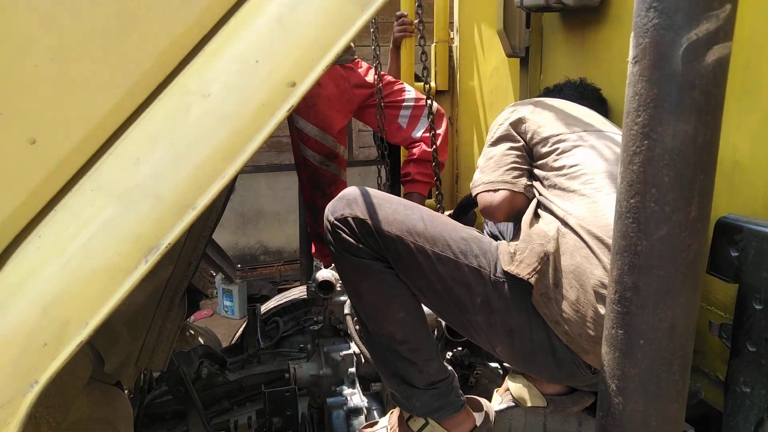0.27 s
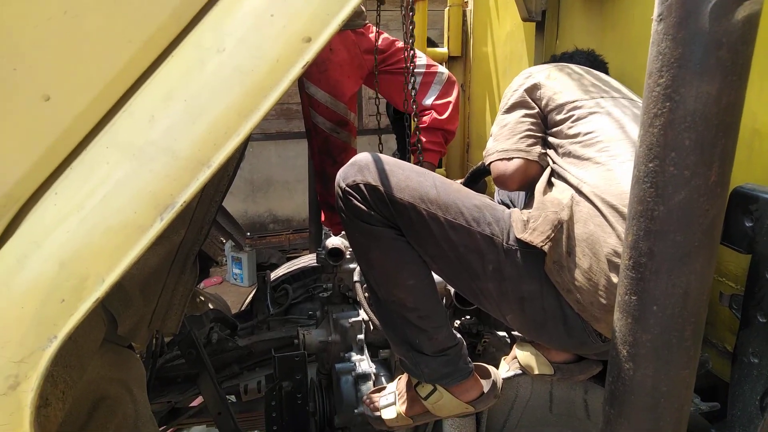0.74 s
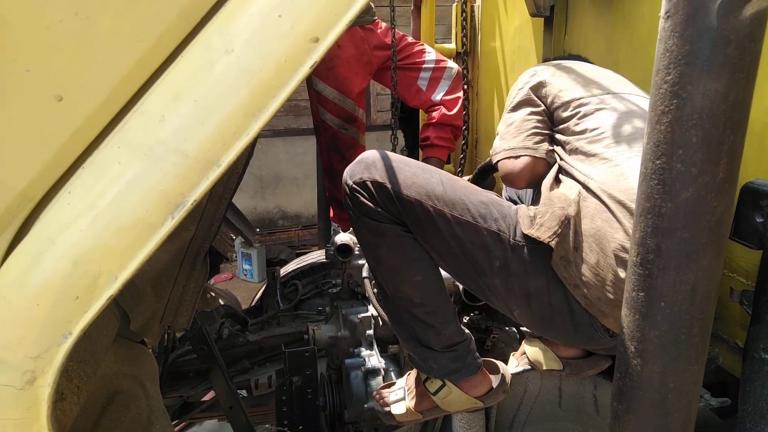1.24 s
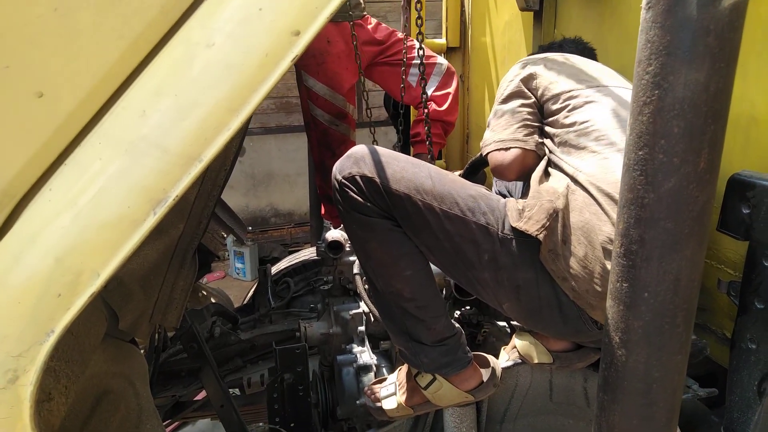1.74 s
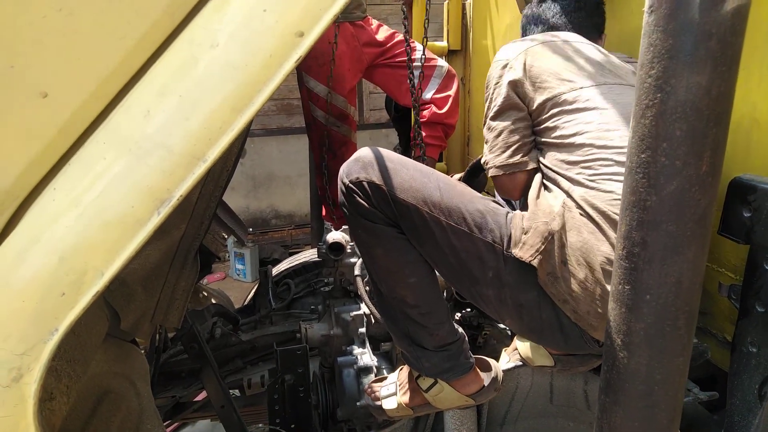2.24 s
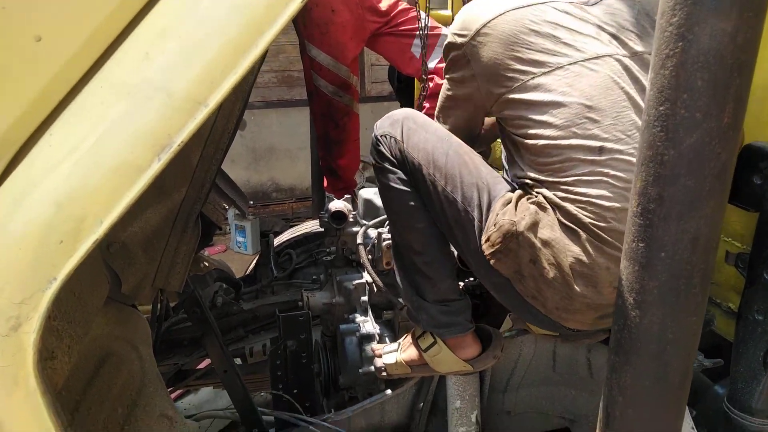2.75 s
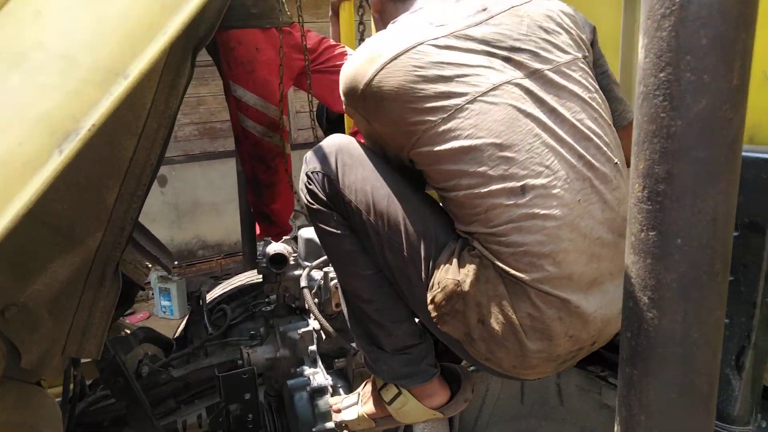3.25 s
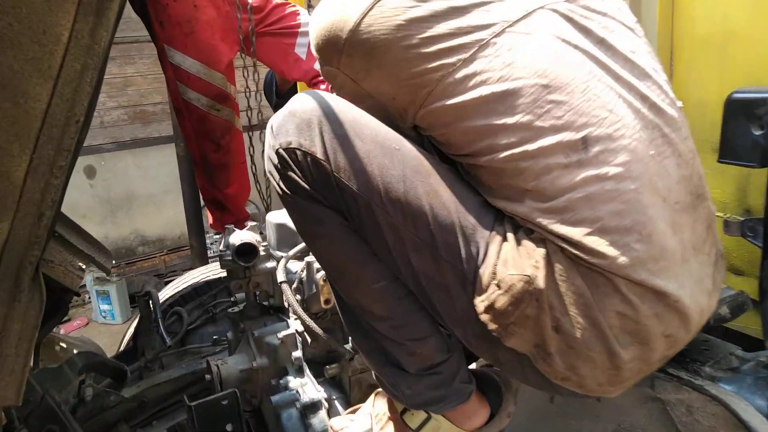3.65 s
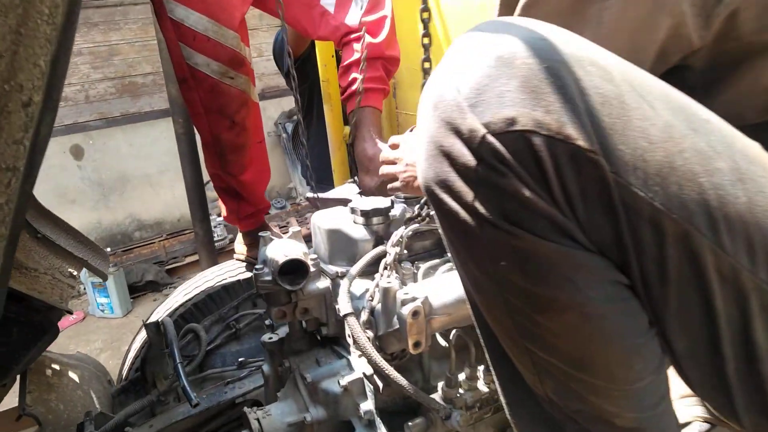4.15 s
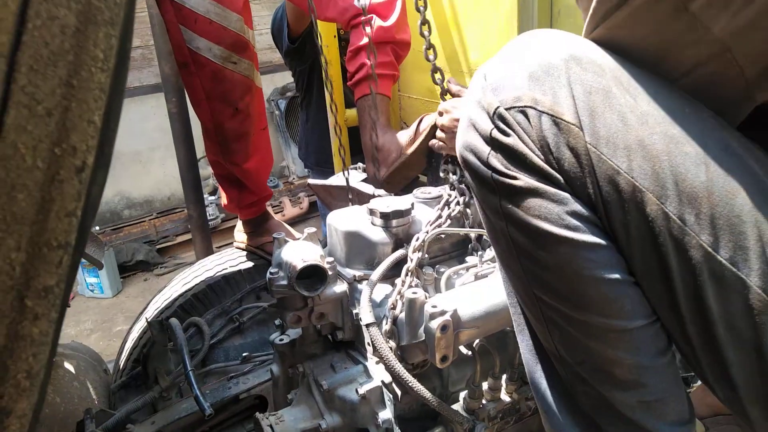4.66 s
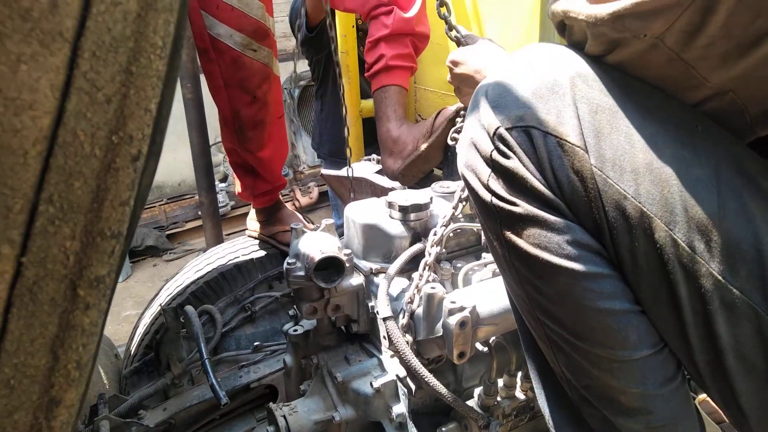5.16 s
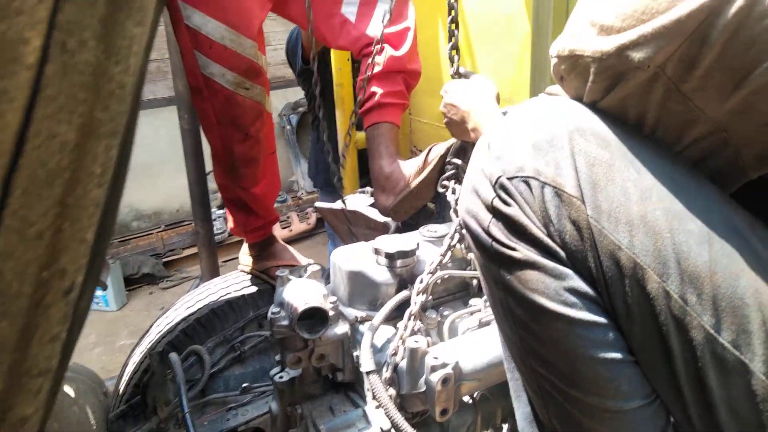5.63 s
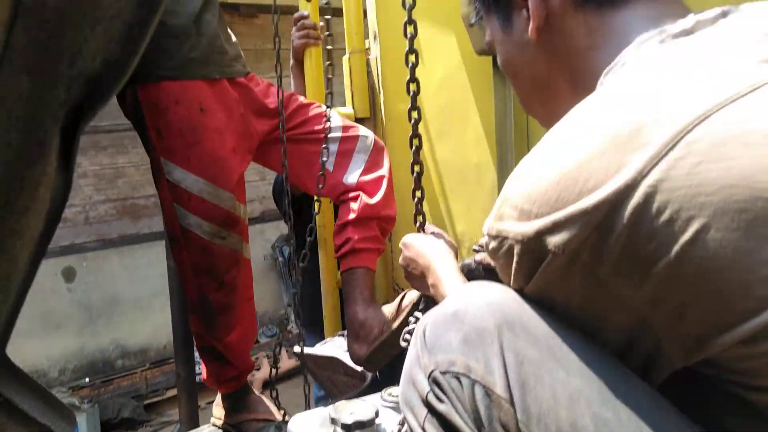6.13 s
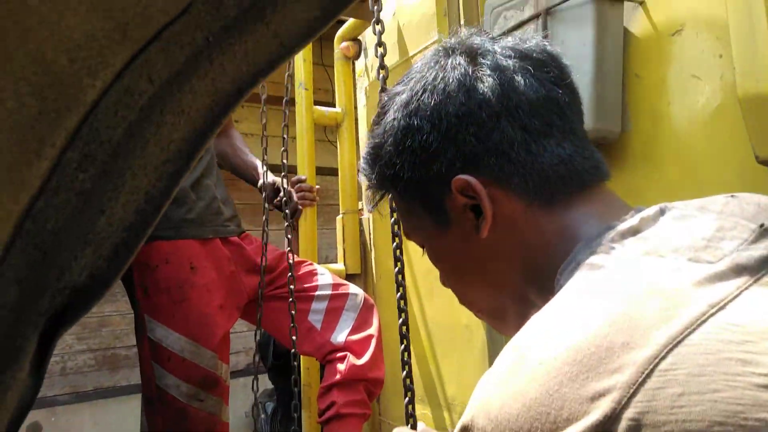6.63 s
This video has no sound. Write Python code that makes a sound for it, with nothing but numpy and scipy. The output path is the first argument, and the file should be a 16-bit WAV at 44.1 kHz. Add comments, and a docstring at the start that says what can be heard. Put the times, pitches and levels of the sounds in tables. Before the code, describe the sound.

Heavy chain links jingle and clatter over a hoist wheel, with ratchet clicks early on and increasingly loud metallic slaps on a truck cab.

```python
"""In an open-air workshop, a manual chain hoist is worked over a truck engine.
Its pawl clicks in runs, built from short bursts of coloured noise timed by the teeth.
The swinging chain slaps the tilted steel cab: noise bursts shake decaying sine waves, the panel's modes.
The hand chain runs in a stream of tiny random contacts, which jingle on high notes and set the
hoist's wheel and housing ringing. Low noise makes the yard, and pairs of tones the singing wheel."""
import sys
import numpy as np
from scipy import signal
from scipy.fft import rfft, irfft
from scipy.io import wavfile
from scipy.ndimage import map_coordinates

SR = 44100
rng = np.random.default_rng(int(sys.argv[2]) if len(sys.argv) > 2 else 0)


def pcm_store(signal):
    """Save signal as 16-bit PCM."""
    levels = np.round(np.clip(np.atleast_2d(signal), -1, 1) * 32767)
    wavfile.write(sys.argv[1], SR, levels.astype(np.int16).T)


N = 303849

# All table levels are relative: the functions add fixed offsets to them.
# pawl hauls, each a list of points: (t/s, speed/teeth per s, level/dB)
PAWL_HAULS = [
    [(0.012, 26, -26), (0.17, 30.1, -22), (0.213, 44.5, -22.5), (0.466, 66.5, -24.5), (0.529, 30.2, -24),
     (0.63, 11.6, -23)],
    [(1.656, 10, -22.5), (1.7, 10, -22.5)],
    [(1.809, 18.6, -28), (1.94, 18.6, -27)],
    [(2.202, 24.2, -22), (2.434, 15, -23), (2.552, 40.7, -21.5), (2.85, 44, -24.5), (3.14, 38, -28)],
]
# short trains of blows on the cab, mostly the slack chain hitting it; the train from 1.809 s falls with the
# pawl's teeth: (first t/s, last t/s, count, clang level/dB, boom level/dB, edge level/dB, change from blow to
# blow/dB, note of the striking links f/Hz)
CAB_SLAPS = [(0.005, 0.045, 2, -22, -28.5, -29, -0.5, 2410), (0.11, 0.16, 3, -19.5, -34, -47, -1, 2153),
             (0.29, 0.311, 2, -13, -26, -22.5, 1, 1800), (0.362, 0.418, 2, -14, -24, -22, -2, 1754),
             (0.452, 0.492, 2, -14.5, -20.5, -19.5, -2.5, 1650),
             (0.901, 1.021, 3, -24, -28, -29.5, -5.5, 2960),
             (1.171, 1.202, 2, -32.5, -32.5, -44.5, -0.5, 2354),
             (1.5, 1.555, 2, -37, -49, -44.5, -0.5, 3360), (1.72, 1.745, 2, -25, -32, -38, -1, 2820),
             (1.809, 1.917, 3, -21.5, -26.5, -30.5, 2.5, 1843),
             (1.966, 2.045, 2, -28, -33.5, -35, -3.5, 1580), (2.5, 2.533, 2, -15.5, -24, -35, 2.5, 1757),
             (2.581, 2.607, 2, -12.5, -19.5, -37, -0.5, 1740),
             (2.655, 2.701, 2, -13.5, -20.5, -20.5, -2, 2660),
             (2.796, 2.84, 2, -18, -16.5, -20.5, -1, 2790), (2.992, 2.992, 1, -16.5, -22, -20, 0, 3450),
             (3.053, 3.053, 1, -16.5, -13, -20, 0, 2890), (3.181, 3.227, 2, -17.5, -26, -38, 2.5, 1810),
             (4.171, 4.171, 1, -12.5, -38, -39, 0, 1255), (4.547, 4.574, 2, -10.5, -28.5, -27, -6.5, 1872),
             (4.631, 4.656, 2, -10.5, -28, -25.5, -1, 2170), (4.712, 4.731, 2, -13, -26.5, -23, 0.5, 978),
             (4.787, 4.827, 3, -17, -28, -23, 2, 1997), (5.186, 5.252, 2, -15.5, -36.5, -17.5, -3, 2940),
             (5.523, 5.553, 2, -11, -23.5, -22, 0, 1655), (5.595, 5.612, 2, -14, -24.5, -22, -2.5, 2470),
             (5.65, 5.65, 1, -12.5, -30.5, -21.5, 0, 2970), (5.867, 5.867, 1, -17.5, -45, -15, 0, 2090),
             (5.889, 5.966, 3, -11, -24.5, -22.5, -1, 1834), (6.013, 6.113, 2, -19, -28.5, -24, -0.5, 1804),
             (6.26, 6.301, 2, -12, -35.5, -16.5, -1, 1776), (6.318, 6.359, 2, -12.5, -30, -22.5, -1, 1250),
             (6.403, 6.433, 2, -14, -24.5, -21, -5, 1310), (6.593, 6.593, 1, -13, -21.5, -20.5, 0, 3070)]
# links knocking on the hoist in trains: (first t/s, last t/s, count, ring level/dB, edge level/dB,
# change from blow to blow/dB)
HOIST_KNOCKS = [(0.845, 0.845, 1, -55, -52, 0), (1.09, 1.125, 2, -46, -48.5, -2),
                (1.27, 1.33, 2, -35, -53, -9), (1.465, 1.465, 1, -42, -60, 0),
                (2.194, 2.313, 2, -19.5, -30, -1), (3.282, 3.343, 2, -22, -39, 3),
                (3.405, 3.461, 2, -17.5, -22, -0.5), (3.505, 3.589, 3, -14.5, -22, -1),
                (3.68, 3.783, 3, -16, -29, 0), (4.013, 4.04, 2, -17.5, -22.5, 2.5),
                (4.17, 4.23, 2, -20, -40, -1.5), (4.319, 4.356, 2, -20, -23, 3.5),
                (5.057, 5.057, 1, -24.5, -46, 6), (5.469, 5.469, 1, -23.5, -48, 0),
                (6.152, 6.198, 2, -41, -25.5, 3.5)]
# the running chain: (t/s, jingle level/dB, clatter level/dB)
CHAIN_RUN = [(0.0, -30.5, -30), (0.5, -34, -26.5), (0.85, -66, -67), (1.08, -57, -48), (1.42, -84, -66),
             (1.6, -49.5, -37), (1.97, -41, -25.5), (2.15, -61, -44), (2.6, -27.5, -19), (3.0, -29, -24.5),
             (3.33, -38, -28.5), (3.55, -24, -26.5), (4.15, -23.5, -28), (4.27, -28, -37.5),
             (4.45, -21, -30.5), (4.65, -31.5, -36.5), (5.33, -27.5, -34.5), (5.48, -24, -31),
             (5.72, -32.5, -42), (5.84, -25, -36.5), (6.07, -35, -41.5), (6.55, -29, -34.5),
             (6.89, -20, -32)]
# soft low bumps: (t/s, level/dB)
LOW_BUMPS = [(1.048, -33), (1.268, -32), (1.906, -37.5), (1.949, -31), (3.367, -30), (3.4, -36)]
# ringing modes of the cab's sheet steel: (f/Hz, energy level/dB, t60/s)
CAB_MODES = [(101.2, -8.5, .7), (167.6, -1, 1), (228.2, 0, 0.26), (243.7, -4, 0.26), (275, -0.5, 0.12),
             (380.5, -9, 0.18), (412, 3, 0.24), (730, 1, 0.21), (759, -1, 0.065), (962, -1, 0.15),
             (1193, -10, 0.53), (1381, 1.5, 0.1), (1670, 2, 0.35), (1802, 1, 0.25), (1930, 0.5, 0.1),
             (2384, 2.5, .15), (2930, -17, 0.19), (3090, -14, 0.089), (3550, 2.5, 0.11)]
# ringing modes of the hoist's wheel and housing: (f/Hz, energy level/dB, t60/s)
HOIST_MODES = [(854, -3.5, 0.37), (964, -7, .08), (1137, -14, 0.4), (1265, -11, 0.21), (1509, -9, 0.68),
               (1767, 0, 0.079), (2034, -3, 0.065), (2470, 5, 0.072), (2575, 3, 0.044), (3470, 1, 0.055),
               (4400, -6, .1), (4690, -3.5, 0.27), (5190, -3, .2)]
# spectrum shapes, whose overall level is evened out later: each (f/Hz, level per Hz/dB)
CLICK_COLOUR = [(500, -15.5), (900, -6), (1800, -21.5), (3500, -9), (5200, -5), (6000, -3), (6530, 1),
                (6900, -4), (7750, 1.5), (8200, -5.5), (8850, -1.5), (9500, -13.5), (12500, -20),
                (15500, -41)]  # pawl on tooth
BOOM_COLOUR = [(50, -41), (100, -29), (180, -17.5), (240, -4), (310, -5), (420, 4.5), (520, -10),
               (620, -10), (760, -1.5), (950, -18.5), (2000, -58)]  # low part of a slap
CLANG_COLOUR = [(60, -42), (250, -24), (550, -20), (760, -4.5), (1050, -2), (1400, -2.5), (1750, 2),
                (2100, 1), (2400, -0.5), (2700, -0.5), (3000, 3.5), (3400, -5), (4200, -5.5), (7000, -43)]  # middle part of a slap
EDGE_COLOUR = [(2000, -46), (4000, 2), (5300, 8), (6400, 7), (7500, 3), (9500, -4), (13000, -13.5),
               (15500, -63)]  # bright part of slaps and knocks
JINGLE_COLOUR = [(1800, -49), (3000, -6.5), (3900, -12.5), (4400, -6.5), (5000, -8.5), (5500, -0.5),
                 (5900, -2), (6350, 3), (6800, -3), (7600, -6), (9000, -10), (11000, -15.5), (13200, -22),
                 (15500, -42)]  # small links
SCRAPE_COLOUR = [(50, -39), (100, -24), (250, -23), (520, -1.5), (820, 4), (1500, 3), (2500, 0.5),
                 (3000, 4.5), (3550, 2), (3950, -6.5), (4500, 5), (7000, -32.5)]  # chain on wheel
RUMBLE_COLOUR = [(20, -16), (33, -17), (45, 6.5), (65, -5.5), (110, 0.5), (200, -9), (400, -15),
                 (1000, -45), (4000, -25), (15000, -61)]  # yard
# the wheel sings under the sliding chain: (start t/s, end t/s, pitch f/Hz, level/dB)
WHEEL_SONGS = [(3.62, 4.246, 1549, -34.5), (6.616, 6.89, 1593, -37.5)]
# the moving microphone hears the parts differently: (t/s, hoist ring level/dB,
# deep panel level/dB, top treble level/dB, hollow boom level/dB)
MIC_VIEW = [(0, -9, -8, 3.5, 5.5), (1.2, -14, -14.5, 2.5, -1.5), (1.9, -26, -3.5, -5, 0),
            (3.1, -8.5, -16, -7.5, -1.5), (3.5, -7.5, -5, -4, 0), (4.2, -2, -6, 4, -0.5),
            (5.3, -1.5, 5, 3.5, 0), (6.2, 3.5, -3, 3, 0), (6.89, -2, 9.5, 0, 2)]
# loose links passing over the wheel: (t/s, speed/links per s)
LINK_SPEED = [(0, 0), (.62, 0), (.7, 14.5), (1.6, 13.5), (2.1, 0), (3.1, 0), (3.45, 61)]
# the drone is louder once the microphone has moved in beside the cab: (t/s, level/dB)
NEAR_CAB_LEVEL = [(0, -4.5), (1.9, -1), (4.2, -4.5), (4.8, 2), (6.89, 3)]

SING_RISE_S, SING_FALL_DB_PER_S = 0.15, 38
YARD_DB, YARD_WANDER_DB = -51.5, 2  # rumble of the yard and its slow drift
DRONE_RISE_S, DRONE_T60_S = 0.022, 0.84  # the cab keeps shaking after each slap
DRONE_SLAP_DB, DRONE_CLATTER_DB = -17, -16.5  # its share of the boom and of the running clatter
LINK_SPREAD = 0.0398  # typical spread of the main link notes in one train, as a log ratio
CLATTER_PER_S, CLATTER_UNEVEN_DB = 38, 2.5  # the clatter comes in clumps as links ride over the wheel
PINGS_PER_S, PING_DB = 24, -5.5  # single links ping the wheel at random, relative to the clatter
LOW_CUT_HZ, TOP_HZ = 34, 15700
DEEP_MODE_HZ = 300  # cab modes below this count as deep


def amp(db):
    """Turn decibels into gain."""
    return np.exp(np.asarray(db) * (np.log(10) / 20))


def unit(x):
    """Scale a sound to rms 1."""
    return x / np.sqrt(np.mean(x ** 2) + 1e-20)


def curves(rows):
    """Draw straight lines between table points: one value per sample for each column after time."""
    s, *cols = np.transpose(rows)
    return [np.interp(np.arange(N) / SR, s, c) for c in cols]


def wobble(rate):
    """Make a smooth random curve with this many random points a second."""
    at = np.arange(0, N + 64, 64)
    knots = rng.standard_normal(int(N * rate / SR) + 4)
    return np.interp(np.arange(N), at, map_coordinates(knots, [at * rate / SR]))


def through(x, response):
    """Pass a sound through an impulse response scaled to energy 1."""
    return signal.oaconvolve(x, response / np.linalg.norm(response))[:N]


def colour(points, size=4096):
    """Make an impulse response with the given spectrum that starts without delay."""
    hz, db = np.transpose(points)
    grid = np.log(np.fft.rfftfreq(size, 1 / SR) + 1)
    gain = amp(np.interp(grid, np.log(hz), db))
    cepstrum = irfft(np.log(gain + 1e-6))
    # folding the cepstrum forward packs the energy at the start (minimum phase)
    cepstrum[1:size // 2] *= 2
    cepstrum[size // 2 + 1:] = 0
    return irfft(np.exp(rfft(cepstrum)))


def ringing(modes):
    """Add up sine waves that die away, one for each way the metal can vibrate."""
    t = np.arange(SR) / SR
    total = 0
    for hz, db, t60 in modes:
        decay = amp(db - 60 * t / t60) / np.sqrt(t60)  # longer rings start softer, for equal energy
        total = total + decay * np.sin(2 * np.pi * hz * t)
    return total


def deep_cab():
    """Ring only the deepest modes of the cab's sheet steel."""
    return ringing([mode for mode in CAB_MODES if mode[0] < DEEP_MODE_HZ])


def chatter(times, db, rise, t60, grain_db):
    """Make each blow a quickly dying shower of tiny contacts, as noise of uneven size."""
    t = np.arange(SR // 2) / SR
    shape = (1 - np.exp(-t / rise)) * amp(-60 * t / t60)
    blows = np.bincount(np.clip(times * SR, 0, N - 1).astype(int), amp(db) ** 2, N)
    power = np.abs(signal.oaconvolve(blows, (shape / shape.max()) ** 2)[:N])
    grains = rng.standard_normal(N) * amp(grain_db * rng.standard_normal(N))
    return np.sqrt(power) * unit(grains)


def contacts(rate, scatter_db):
    """Scatter link contacts of uneven size at random times, scaled to rms 1."""
    chance, size, sign = rng.random(N), rng.standard_normal(N), rng.choice([-1, 1], N)
    return unit((chance < rate / SR) * sign * amp(scatter_db * np.clip(size, -2, 2)))


def echo(x, t60, size=4096):
    """Make a diffuse tail of dying noise, drawn afresh for each block so no fixed colouring builds up."""
    t = np.arange(SR // 3) / SR
    blocks = np.pad(x, (0, -N % size)).reshape(-1, size)
    fade = amp(-60 * t / t60) * (1 - np.exp(-t / 0.0059))
    tails = rng.standard_normal((len(blocks), len(t))) * fade
    tails = tails / np.linalg.norm(tails, axis=1, keepdims=True)
    wet = signal.fftconvolve(blocks, tails, axes=1)
    out = np.zeros(N + SR)
    for i, part in enumerate(wet):
        out[i * size:][:len(part)] += part
    return out[:N]


def trains(rows):
    """List time and levels of every blow: evenly spaced, each a fixed step louder or softer."""
    blows = []
    for first, last, count, *levels, step in rows:
        for k, s in enumerate(np.linspace(first, last, int(round(count)))):
            blows.append((s, *(np.array(levels) + k * step)))
    return np.transpose(blows)


def slap_blows():
    """List time, clang, boom and edge of every blow on the cab."""
    return trains([row[:-1] for row in CAB_SLAPS])


def yard():
    """Make the low background of the open yard from coloured noise that drifts slowly in level."""
    level = amp(YARD_DB + YARD_WANDER_DB * wobble(rate=3.08))
    return level * through(rng.standard_normal(N), colour(RUMBLE_COLOUR))


def bumps(hz=85, t60=0.035):
    """Make dull bumps from a low sine wave that dies within a few cycles."""
    s, db = np.transpose(LOW_BUMPS)
    t = np.arange(SR // 4) / SR
    push = np.sin(2 * np.pi * hz * t) * (1 - np.exp(-t / 0.0034)) * amp(-60 * t / t60)
    hits = np.bincount((s * SR).astype(int), amp(db + 13.5), N)
    return signal.fftconvolve(hits, push)[:N]


def drone():
    """Every slap, and the running chain too, keeps the cab's deepest modes shaking."""
    s, _, boom_db, _ = slap_blows()
    _, clatter_db = curves(CHAIN_RUN)
    near_db, = curves(NEAR_CAB_LEVEL)
    shaking = chatter(s, boom_db + DRONE_SLAP_DB, rise=DRONE_RISE_S, t60=DRONE_T60_S, grain_db=2.5)
    shaking = shaking + amp(clatter_db + DRONE_CLATTER_DB) * rng.standard_normal(N)
    return amp(near_db) * through(shaking, deep_cab())


def singing_wheel(lower_hz=59, waver_db=2, waver_hz=3):
    """The dragging chain bows a close pair of the wheel's modes, which swell, waver and ring out."""
    t = np.arange(N) / SR

    def tone(hz):
        """Sum up a wavering pitch into the phase of a sine wave."""
        return np.sin(2 * np.pi * np.cumsum(hz + waver_hz * wobble(rate=30)) / SR)

    out = np.zeros(N)
    for start, end, hz, db in WHEEL_SONGS:
        rise = np.clip((t - start) / SING_RISE_S, 0, 1)
        swell = rise * amp(db - SING_FALL_DB_PER_S * np.maximum(t - end, 0))
        out += swell * (tone(hz) + amp(-8.5) * tone(hz - lower_hz))
    return amp(5.0 + waver_db * wobble(rate=22)) * out


def clinks(t60, spread, count):
    """Each striking link rings on its own note and a few weaker ones around it."""
    t = np.arange(SR // 4) / SR
    out = np.zeros(N + SR)
    for *train, hz in CAB_SLAPS:
        for s, db, _, _ in trains([train]).T:
            scatter, phase = rng.standard_normal((count, 1)), rng.random((count, 1))
            detune = np.vstack([LINK_SPREAD * scatter[:1], spread * scatter[1:]])
            notes = np.sin(2 * np.pi * (hz * np.exp(detune) * t + phase))
            ring = notes[0] + amp(-8.0) * notes[1:].sum(0)
            fade = amp(db - 60 * t / t60) * (1 - np.exp(-t / 0.0035))
            out[int(abs(s) * SR):][:len(t)] += fade * ring
    return out[:N]


def slaps():
    """The slack chain hits the cab: the panel booms and clangs, the links add a bright edge."""
    s, clang_db, boom_db, edge_db = slap_blows()
    _, deep_db, _, hollow_db = curves(MIC_VIEW)
    boom = chatter(s - .002, boom_db - 2.0, rise=0.0012, t60=0.16, grain_db=4.5)
    boom = through(boom, colour(BOOM_COLOUR))
    clang = chatter(s - .001, clang_db - 7, rise=0.0014, t60=0.16, grain_db=4.5)
    clang = through(clang, colour(CLANG_COLOUR))
    edge = chatter(s - .002, edge_db - 1.5, rise=0.0048, t60=0.074, grain_db=2.0)
    edge = through(edge, colour(EDGE_COLOUR))
    deep_panel = amp(deep_db - 16.0) * through(boom, deep_cab())
    panel = deep_panel + amp(-13) * through(clang, ringing(CAB_MODES))
    link_notes = amp(-3.5) * clinks(t60=0.09, spread=.18, count=7)
    return amp(hollow_db) * boom + clang + panel + edge + link_notes


def teeth(haul):
    """Add up the speed to find when each tooth passes the pawl, and how loud it is."""
    s, speed, db = np.transpose(haul)
    t = np.arange(s[0], s[-1], 1 / SR)
    passed = np.cumsum(np.interp(t, s, speed)) / SR
    times = np.interp(np.arange(int(passed[-1]) + 1), passed, t)
    return np.array([times, np.interp(times, s, db)])


def pawl(uneven_db=1.5):
    """The pawl snaps into each tooth with a short bright ring."""
    s, db = np.hstack([teeth(haul) for haul in PAWL_HAULS])
    db = db + uneven_db * wobble(rate=60)[np.clip(s * SR, 0, N - 1).astype(int)]
    snap = chatter(s - .002, db + .5, rise=0.0032, t60=0.044, grain_db=4.5)
    tail = echo(snap, t60=0.031)
    return through(snap, colour(CLICK_COLOUR)) + amp(-9.0) * through(tail, colour(CLICK_COLOUR))


def link_ticks():
    """Make one sharp tick for each link that drops into a pocket of the wheel."""
    speed, = curves(LINK_SPEED)
    passed = np.cumsum(np.maximum(speed, 0)) / SR
    s = np.flatnonzero(np.diff(np.floor(passed))) / SR
    chance = rng.standard_normal((len(s), 2))  # uneven timing and level
    ticks = chatter(s + .002 * chance[:, 0], 2 * chance[:, 1], rise=.0005, t60=.028, grain_db=3)
    return unit(ticks)


def links(t60=0.071, count=90):
    """Small links touch in a dense stream, on many high notes, mixed with the wheel's ticking."""
    t = np.arange(SR // 10) / SR
    notes_hz = np.linspace(3500, 14500, count) * (1 + 0.0076 * rng.standard_normal(count))
    touches = contacts(rate=1600, scatter_db=0.5)
    owner = rng.integers(count, size=N)  # which note each touch rings
    ring = np.zeros(N + len(t))
    tones = np.sin(2 * np.pi * notes_hz[:, None] * t) * amp(-60 * t / t60)
    for i in np.flatnonzero(touches):
        ring[i:i + len(t)] += touches[i] * tones[owner[i]]
    stream = amp(9) * unit(ring[:N]) + amp(3.5) * touches + echo(touches, t60=0.016)
    mixed = unit(stream) + amp(-3) * link_ticks()
    return unit(through(mixed, colour(JINGLE_COLOUR)))


def running_chain():
    """Links jingle along the chain and clatter over the wheel; knocks and single links make it ping."""
    jingle_db, clatter_db = curves(CHAIN_RUN)
    clatter_db = clatter_db + CLATTER_UNEVEN_DB * wobble(rate=CLATTER_PER_S)
    ring_db = curves(MIC_VIEW)[0]
    s, knock_db, edge_db = trains(HOIST_KNOCKS)
    blows = chatter(s - .002, knock_db - 4.0, rise=0.0007, t60=0.12, grain_db=-1.5)
    blows = blows + amp(clatter_db - 4.0) * contacts(rate=2200, scatter_db=0)
    pings = np.bincount((s * SR).astype(int), amp(knock_db + 24), N)
    pings = pings + amp(clatter_db + PING_DB) * contacts(rate=PINGS_PER_S, scatter_db=1.5)
    scrape = amp(-5) * through(blows, colour(SCRAPE_COLOUR))
    ring = amp(ring_db) * through(blows + pings, ringing(HOIST_MODES))
    edge = chatter(s - .002, edge_db - 4.0, rise=.0015, t60=0.2, grain_db=1)
    edge = through(edge, colour(EDGE_COLOUR))
    return scrape + ring + edge + amp(jingle_db - 1.5) * links()


def shaded(x, corner_hz=9500):
    """The top treble rises and falls; the cab's edge and the crouching worker at times hide it."""
    high_pass = signal.butter(3, corner_hz, "high", fs=SR, output="sos")
    top = signal.sosfiltfilt(high_pass, x)
    return x + (amp(curves(MIC_VIEW)[2]) - 1) * top


def scene():
    """Mix the yard, the cab, the hoist and a short echo from the cab and walls."""
    hoist = shaded(pawl() + slaps() + running_chain())
    reflections = amp(-6.5) * echo(hoist, t60=0.24)
    background = yard() + bumps() + drone()
    return (background + singing_wheel() + reflections + hoist)[None]


def record(dry):
    """Cut the deepest bass, round off the highest peaks and keep nothing above the band limit."""
    low_cut = signal.butter(4, LOW_CUT_HZ, "high", fs=SR, output="sos")
    heard = signal.sosfilt(low_cut, dry)
    held = heard / (1 + (heard / .52) ** 6) ** (1 / 6)  # peaks bend over towards 0.52
    return irfft(rfft(held) * (np.fft.rfftfreq(N, 1 / SR) < TOP_HZ), N)


dry = scene()
out = record(dry)
pcm_store(out)
```